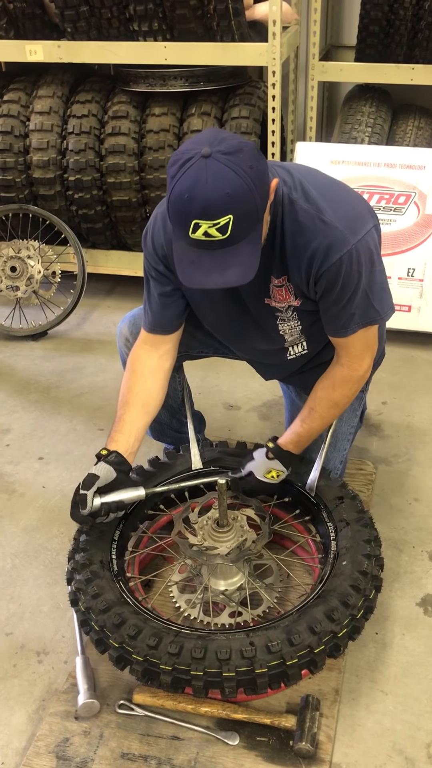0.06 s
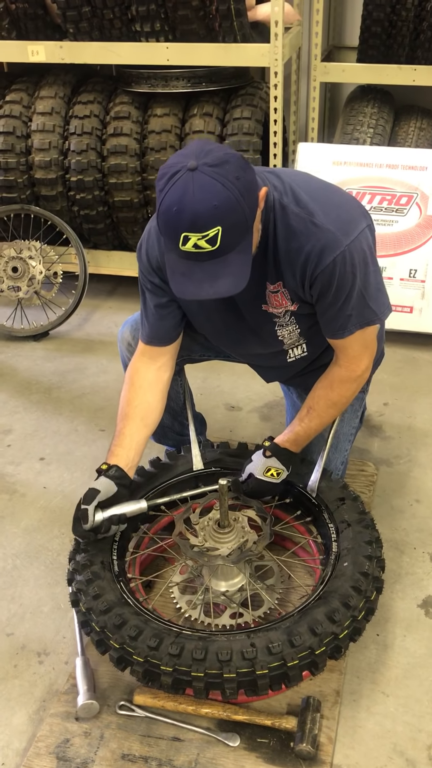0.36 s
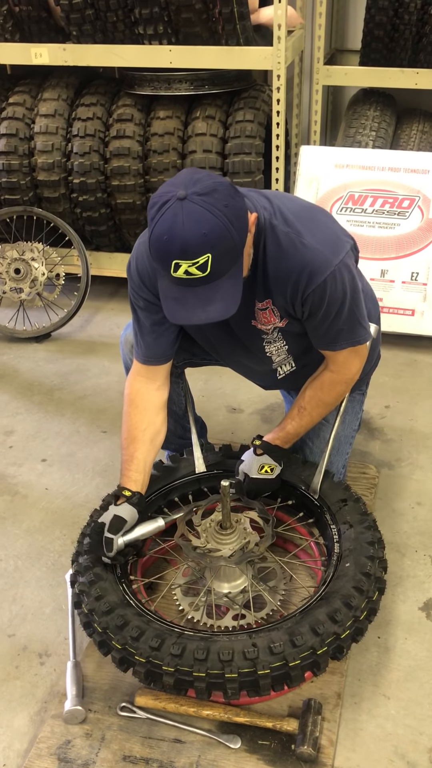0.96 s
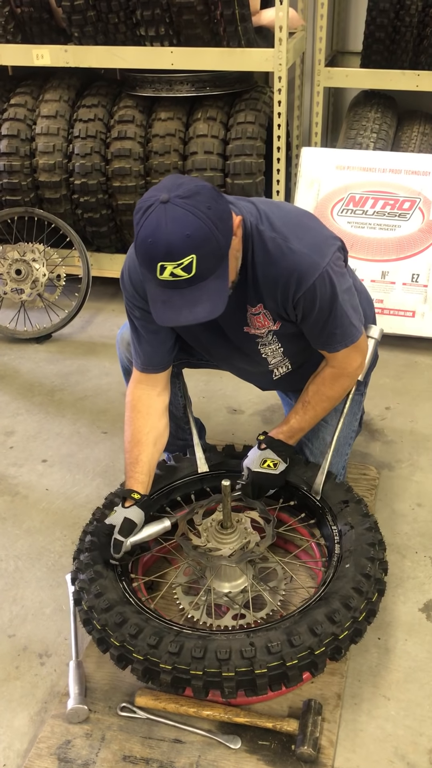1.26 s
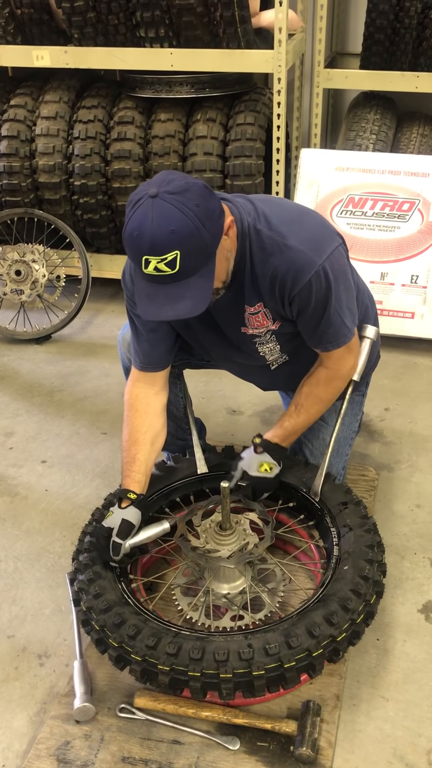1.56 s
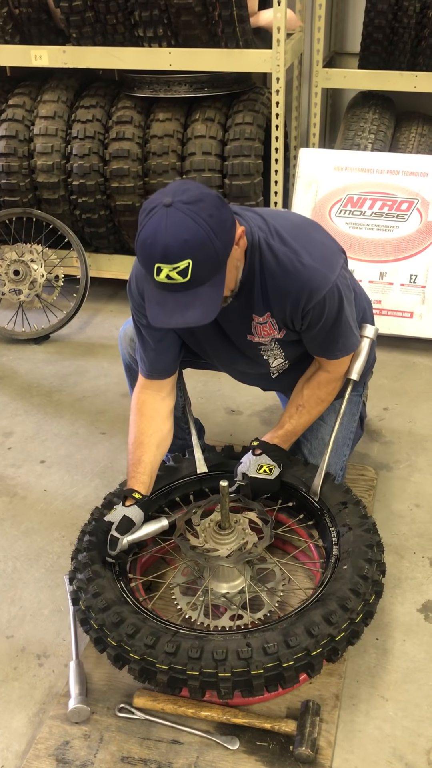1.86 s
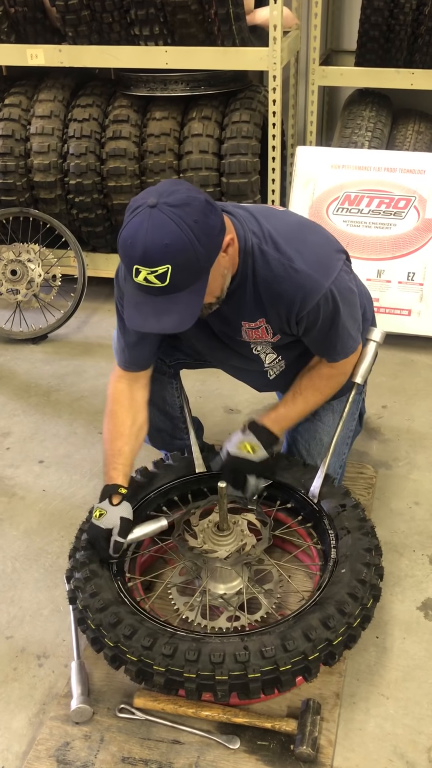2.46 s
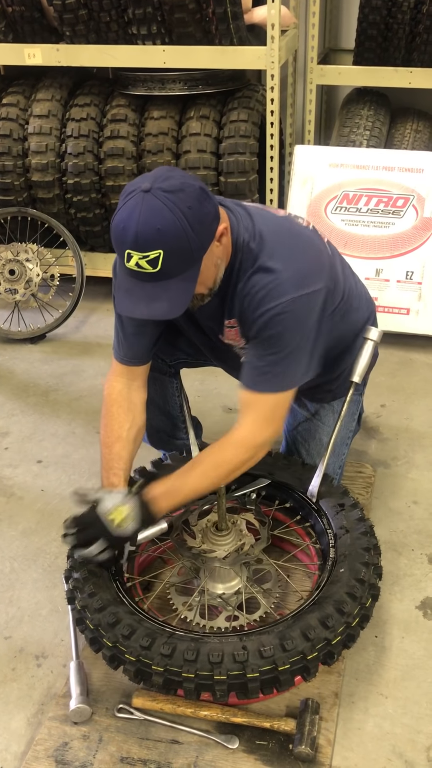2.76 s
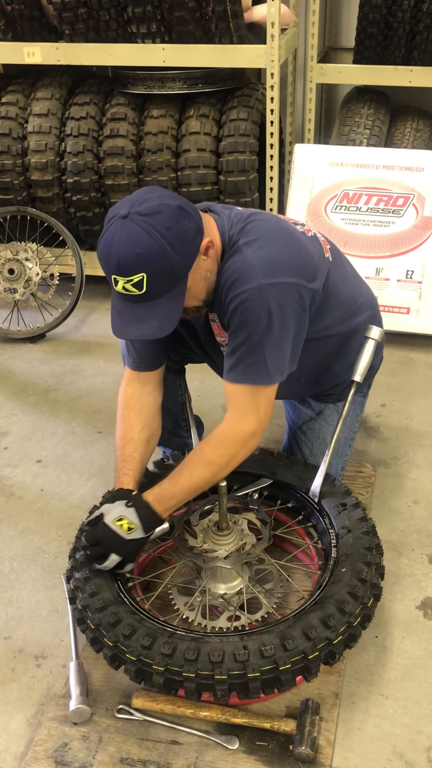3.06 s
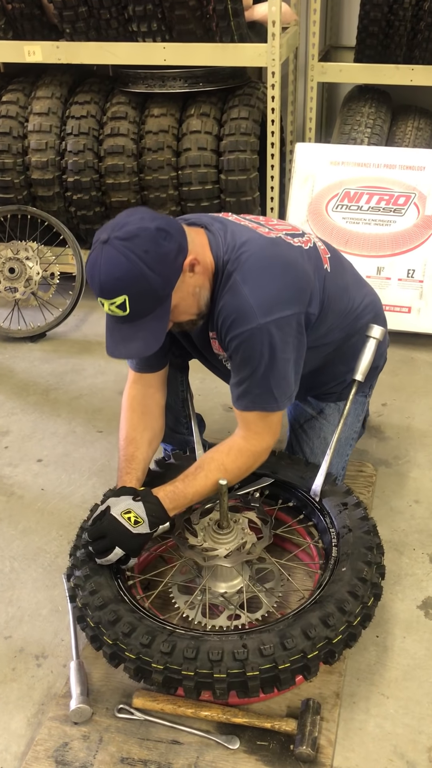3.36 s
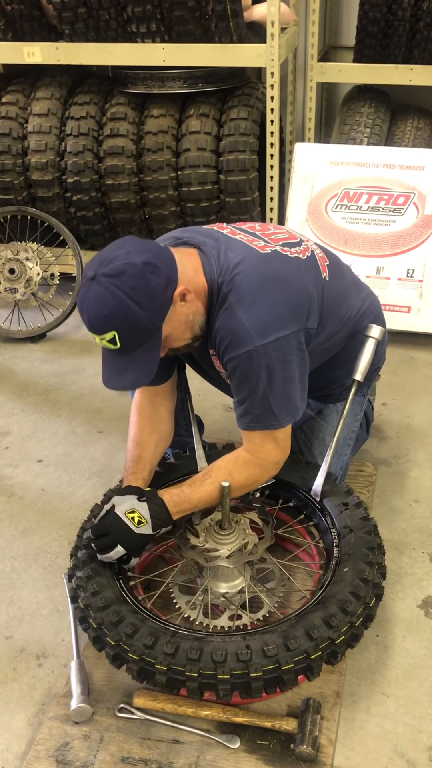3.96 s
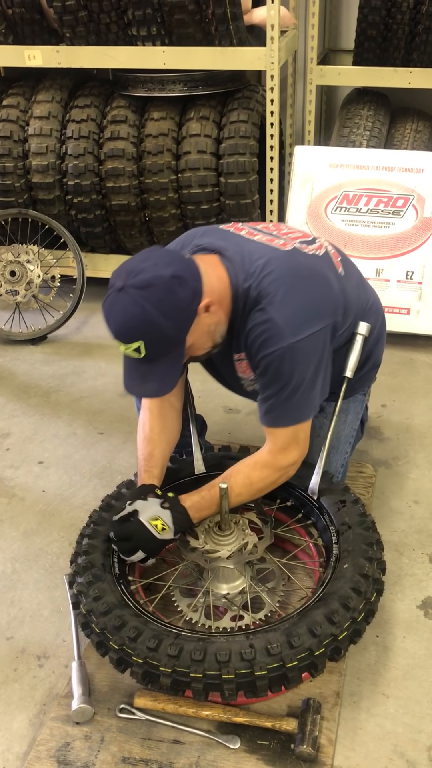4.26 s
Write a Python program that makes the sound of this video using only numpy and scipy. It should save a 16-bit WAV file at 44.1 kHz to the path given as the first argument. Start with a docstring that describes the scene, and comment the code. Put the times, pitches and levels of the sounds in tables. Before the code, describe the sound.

Steel tire irons work a tire onto a spoked motorcycle rim in a reverberant, hard-walled workshop, over a low, steady ventilation rumble. At about 0.6 seconds an iron clanks on the rim and rings briefly. Soft rubbing of gloves and rubber follows, with light clinks from 1.1 to 1.5 seconds and a few tiny, faint chirps around 1.7. From 2.1 seconds the iron creaks under load, growing louder and shriller. At 2.4 it skids with a loud clatter and a bright, quickly damped ring, while the tire gives a deep thump. Lighter clinks, soft bumps and rubbing come between 3.0 and 3.4 seconds. At 4.1 the iron skids again with a sharp crack, a quick run of ringing metal knocks and several tire thumps, ending around 4.3. A faint rub follows near 4.5 seconds.

```python
"""In a hard-walled workshop, steel tire irons lever a knobby tire onto a spoked motorcycle rim.
Impacts of an iron excite the modes of the wheel, and the handles ring until a glove damps them.
Under load the iron creaks by stick-slip friction, then skids twice with a clatter, once ringing loudly,
while the jumping bead makes the tire thump. Rubber rubs softly, a few faint chirps sound,
and the room reverberates over the rumble of ventilation."""
import sys
import numpy as np
from scipy import signal
from scipy.fft import rfft, irfft
from scipy.io import wavfile
from scipy.ndimage import uniform_filter1d

SR = 44100
rng = np.random.default_rng(int(sys.argv[2]) if len(sys.argv) > 2 else 0)


def store_pcm(level_fs):
    """Save levels as 16-bit WAV."""
    pcm = np.round(np.clip(level_fs, -1, 1) * 32767).astype(np.int16)
    wavfile.write(sys.argv[1], SR, np.atleast_2d(pcm).T)


N = 198753
TIME = np.arange(N) / SR

# impacts of iron on rim; the tip clinks at a pitch set by where it is pinched:
# (time [s], level [dB], body weight [dB], treble weight [dB], clink pitch [Hz], clink re level [dB])
IMPACTS = [(0.5807, -21.5, -2.5, -8.5, 1273, 7), (0.583, -29.5, -6.5, -17, 2330, 4),
           (1.1361, -47, -16, -1.5, 3180, -3), (1.275, -42.5, -7.5, -0.5, 3520, -16),
           (1.474, -60.5, 0, -29, 2650, 17.5), (2.378, -27.5, -18, 9, 3600, -10),
           (2.391, -25.5, -12, 2, 964, 11.5), (2.434, -22, -16, -18, 2613, 5),
           (3.051, -53.5, -1.5, 5.5, 6610, 9), (3.093, -40, -12, -15, 3486, 4),
           (3.117, -43.5, -14, -4, 1886, 13.5), (3.118, -43, -26, -6, 3470, 11.5),
           (3.275, -44, -4, -8, 5260, 8), (3.411, -39.5, -1.5, -7, 2980, 14),
           (3.4133, -36, -14, -6, 3230, 17.5), (3.415, -37.5, -6.5, -1, 5520, 12.5),
           (3.903, -42, -9, -30, 3220, 7), (4.112, -12.5, -30, 0, 3400, -15),
           (4.166, -30.5, -3, 0, 5510, 17), (4.189, -29, 7.5, -23, 1038, 15.5),
           (4.1999, -17.5, -11, -11, 2013, 7.5), (4.227, -20.5, -9.5, -9, 629, 5.5),
           (4.258, -23.5, -18, -3, 11300, -0.5)]


def amp(db):
    """Amplitude ratio of a level in decibels."""
    return 10 ** (np.asarray(db) / 20)


def unit(x):
    """Normalisation to rms 1."""
    return x / np.sqrt(np.mean(x ** 2) + 1e-20)


def read(points, hz):
    """Interpolation of (frequency [Hz], value) rows on a logarithmic frequency axis."""
    f, value = np.transpose(points)
    return np.interp(np.log(hz + 1), np.log(f + 1), value)


def add(mix, start_s, sound):
    """Superposition of a sound on the mix."""
    part = mix[max(round(start_s * SR), 0):][:len(sound)]
    part += sound[:len(part)]


def through(x, response):
    """Convolution of a track with an impulse response."""
    return signal.oaconvolve(x, response)[:N]


def wander(size):
    """Random fluctuation of rms 1: a moving average of noise over size samples."""
    return unit(uniform_filter1d(rng.standard_normal(N), size))


def stroke(start, length, db, attack_s, release_s, slope_db_per_s=0):
    """Exponential envelope of one movement: a 60 dB attack, a sloping hold, a 60 dB release."""
    t = TIME - start
    outside = np.maximum(-t, 0) / attack_s + np.maximum(t - length, 0) / release_s
    return amp(db + slope_db_per_s * np.clip(t, 0, length) - 60 * np.minimum(outside, 3))


def colour(points, lumps_db=0, size=4096):
    """Minimum-phase filter of energy 1 with the given spectrum and optional random peaks and dips."""
    hz = np.fft.rfftfreq(size, 1 / SR)
    ripple = unit(np.convolve(rng.standard_normal(len(hz)), signal.windows.hann(36), "same"))
    lumps = ripple * hz / (hz + 2000)
    log_gain = np.log(amp(read(points, hz) + lumps_db * lumps))
    mirrored = np.concatenate([log_gain, log_gain[-2:0:-1]])
    taps = np.fft.ifft(np.exp(np.conj(signal.hilbert(mirrored)))).real
    return taps / np.linalg.norm(taps)


def chatter(t60, size=8192):
    """Exponentially decaying noise of many tiny contacts, starting at about rms 1."""
    fade = amp(-60 * np.arange(size) / SR / t60)
    x = rng.standard_normal(size) * fade
    # flattening the spectrum keeps every contact equally strong
    for _ in range(2):
        x = irfft(np.exp(1j * np.angle(rfft(x)))) * np.sqrt(fade)
    return unit(x) * np.sqrt(np.mean(fade ** 2))


def grit(per_s, spread_db):
    """Friction as a Poisson process: random snaps of very unequal size."""
    sizes = amp(spread_db * np.minimum(rng.exponential(1, N), 4))
    return unit(sizes * rng.choice([-1, 1], N) * (rng.random(N) < per_s / SR))


def modes(table, t):
    """Free vibration: one damped sine per row (frequency [Hz], level [dB], t60 [s])."""
    return np.array([amp(db - 60 * t / t60) * np.sin(2 * np.pi * (hz * t + rng.random()))
                     for hz, db, t60 in table])


def resonances(table):
    """Impulse response, of energy 1, of resonators (frequency [Hz], bandwidth [Hz], level [dB])."""
    t = TIME[:SR // 4]
    body = sum(amp(db) * width * np.exp(-np.pi * width * t) * np.cos(2 * np.pi * hz * t)
               for hz, width, db in table)
    return body / np.linalg.norm(body)


def ventilation(level_db=-58):
    """Stationary broadband noise: the low rumble and hiss of the shop's air."""
    # spectrum of the ventilation: (frequency [Hz], relative density [dB])
    spectrum = [(15, -60), (25, -8.5), (69, 2.5), (129, -8.5), (147, -10.5), (363, -14), (393, -14.5),
                (476, -20.5), (942, -22), (1020, -24), (1770, -25.5), (2730, -34.5), (4980, -44),
                (6540, -63.5), (17000, -63)]
    noise = signal.fftconvolve(rng.standard_normal(2 * N), colour(spectrum))
    return amp(level_db) * noise[N // 2:][:N]


def rubbing(attack_s=0.29):
    """Friction noise of gloves and of rubber stretched over the rim; incoherent sources add in power."""
    # a glove or sleeve brushes the tire: (time [s], relative level [dB])
    brushes = [(0.769, -55.5), (1.01, -58), (1.143, -50), (1.28, -52), (1.39, -58.5), (1.67, -63),
               (2.97, -55.5), (3.13, -53.5), (3.757, -58), (4.47, -56)]
    # spectrum of rubbed rubber: (frequency [Hz], relative density [dB])
    spectrum = [(200, 5), (900, 7), (2000, 4.5), (4000, 2.5), (8000, -2), (17000, -4.5)]
    hands_power = sum(stroke(start, 0, db - 1.5, attack_s, release_s=0.41) ** 2 for start, db in brushes)
    strain = stroke(start=1.946, length=0.34, db=-62, attack_s=attack_s, release_s=1.5,
                    slope_db_per_s=44.5)
    fidget = amp(-69)  # faint rubbing that never stops
    friction = np.sqrt(hands_power + strain ** 2 + fidget ** 2)
    return through(grit(per_s=7000, spread_db=5) * friction, colour(spectrum))


def ringing_irons(damped_t60=0.059):
    """Handle and shaft of a freed iron vibrate in their normal modes until the glove adds damping."""
    # free vibrations: (time [s], handle [dB], shaft [dB], undamped time [s], handle tilt [dB/octave])
    rings = [(0.004, -67, -70, .06, 10), (0.262, -67, -77, .012, -11), (0.582, -34.5, -45, .045, -20),
             (1.475, -58, -65, .04, -18), (1.772, -63, -72, .006, 5), (2.385, -38, -43, .03, 2),
             (2.433, -31.5, -30.5, .05, -1), (4.14, -42, -46, .15, 2)]
    # modes of the hollow handle: (frequency [Hz], relative level [dB], t60 [s])
    handle_modes = [(5860, 0, .9), (7090, -3, .6), (8750, -5, .8), (11180, -11, .3), (13680, -20, .25)]
    # bending modes of the steel shaft: (frequency [Hz], relative level [dB], t60 [s])
    shaft_modes = [(757, -5, .4), (1515, -5, .3), (2080, -10, .4), (2700, 1, .3), (2765, -3, .25),
                   (4188, -6, .8)]
    out, t = np.zeros(N), TIME[:SR // 3]
    octaves = np.log2(np.transpose(handle_modes)[0] / handle_modes[0][0])
    for start, handle_db, shaft_db, free_s, tilt_db in rings:
        grip = amp(-60 * np.maximum(t - free_s, 0) / damped_t60)
        handle = amp(handle_db + tilt_db * octaves) @ modes(handle_modes, t)
        shaft = amp(shaft_db) * modes(shaft_modes, t).sum(0)
        add(out, start, grip * (handle + shaft))
    return out


def tire_thumps(push_s=0.0013, t60=0.038, heavy_db=-31):
    """Each jump of the bead excites heavily damped modes of the carcass; heavy jumps sound deeper."""
    # jumps of the bead: (time [s], level [dB])
    jumps = [(0.257, -61), (0.583, -41), (1.437, -43), (1.494, -54.5), (2.3105, -40), (2.3798, -18),
             (2.3907, -29), (2.424, -36), (3.213, -40), (3.277, -45.5), (3.404, -46), (4.116, -22.5),
             (4.198, -23), (4.225, -32), (4.26, -32)]
    # modes of tire and wheel together: (frequency [Hz], relative level [dB])
    carcass_modes = [(125, -3.5), (170, 2.5), (215, 1), (330, -0.5), (430, -3), (545, -2), (640, -6),
                     (860, -3), (1040, -7.5)]
    out, t = np.zeros(N), TIME[:SR // 4]
    hz, mode_db = np.transpose(carcass_modes)
    polarity = (-1) ** np.arange(len(hz))[:, None]
    swings = polarity * np.sin(2 * np.pi * hz[:, None] * t)
    for start, db in jumps:
        fade = amp(db - 60 * t / t60) * (1 - np.exp(-t / push_s))
        tilt_db_per_octave = 0.091 * (heavy_db - db)
        weights = amp(mode_db + tilt_db_per_octave * np.log2(hz / hz[1]))
        add(out, start, fade * (weights @ swings))
    return out


def blows():
    """Impact excitation: each contact chatters briefly, and its spot on the rim shapes the spectrum."""
    out = np.zeros(N)
    for start, db, body_db, treble_db, _, _ in IMPACTS:
        # (frequency [Hz], relative density [dB])
        spectrum = [(80, body_db - 27.5), (300, body_db - 9.5), (560, body_db + 14),
                    (880, body_db + 5.5), (1300, body_db + 11.5), (2000, 1), (3400, 5.5), (6500, -2.5),
                    (10000, treble_db + 0.5), (17000, treble_db - 9.5)]
        gain = amp(db) * np.sqrt(1 + amp(body_db) ** 2 + amp(treble_db) ** 2)
        add(out, start, gain * signal.fftconvolve(chatter(t60=0.043), colour(spectrum, lumps_db=4)))
    return out


def wheel(force, ring_db=-51):
    """Modal response: a contact is heard directly and sets rim, spokes and disc ringing."""
    # modes of the wheel: (frequency [Hz], relative level [dB], t60 [s])
    wheel_modes = [(540, -10, .15), (634, -10, .3), (867, -14, .25), (1035, -10, .2), (1320, -7, .2),
                   (1615, -10, .2), (1990, -8, .2), (2232, -9, .4), (2406, -10, .2), (2512, -9, .3),
                   (2970, -8, .15), (3177, -5, .3), (3440, -5, .15), (3830, -10, .2), (4055, -11, .3),
                   (4560, -8, .25), (5390, -2, .25), (5520, -5, .15), (5825, -5, .35), (7100, -6, .2),
                   (8448, -7, .2), (10140, -6, .2), (11280, -9, .15)]
    response = modes(wheel_modes, TIME[:SR // 2]).sum(0)
    return force + amp(ring_db) * through(force, response)


def clinks(attack_s=0.00059, t60=0.021, buzz_rad=0.72):
    """Damped vibration of the pinched tip, phase-modulated by its buzzing against the rim."""
    out, t = np.zeros(N), TIME[:SR // 6]
    buzz = buzz_rad * unit(uniform_filter1d(wander(size=40), size=40))
    for start, db, _, _, hz, clink_db in IMPACTS:
        phase = 2 * np.pi * hz * t + buzz[round(start * SR):][:len(t)]
        fade = amp(db + clink_db - 60 * t / t60) * (1 - np.exp(-t / attack_s))
        add(out, start, fade * np.sin(phase))
    return out


def chirps(top_hz=5090, level_db=-66, length_s=0.026, arch=0.023):
    """Frequency glides: tiny whistles whose pitch and amplitude rise and fall along a parabola."""
    # onsets of the whistles: (time [s])
    onsets = [1.675, 1.72, 1.783, 4.07]
    out, u = np.zeros(N), np.linspace(-1, 1, round(length_s * SR))
    turns = np.cumsum(top_hz * (1 - arch * u ** 2)) / SR
    whistle = amp(level_db) * (1 - u ** 2) * np.sin(2 * np.pi * turns)
    for start in onsets:
        add(out, start, whistle)
    return out


def creak(slips_per_s=740, jitter=0.5, shrill_lag_s=0.011, shrill_power=5.1):
    """Stick-slip on the rim lip drives the iron's resonances, faster and shriller as the push builds."""
    # resonances of the loaded iron: (frequency [Hz], bandwidth [Hz], relative level [dB])
    body_modes = [(350, 120, -11.5), (530, 174, -6.5), (863, 140, -9), (1650, 120, -1), (1950, 54, -1.5),
                  (2219, 30, 5), (2470, 50, -30.5), (2870, 80, -31)]
    # thin overtones that only a hard push excites: (frequency [Hz], bandwidth [Hz], relative level [dB])
    shrill_modes = [(3480, 70, 6), (4400, 120, -2), (5230, 40, 3), (5480, 90, 1), (7100, 60, -6),
                    (8700, 60, -4), (10200, 55, -5), (12500, 35, -5), (13800, 35, -9), (14400, 35, -7),
                    (15400, 45, -4), (16400, 35, -6)]
    push = stroke(start=2.13, length=0.112, db=-32.5, attack_s=0.13, release_s=0.09, slope_db_per_s=65)
    effort = push / push.max()
    slip_rate = slips_per_s * effort ** 0.16 * np.exp(jitter * wander(size=60))
    slip_count = np.floor(np.cumsum(slip_rate) / SR)
    slips = np.diff(slip_count, prepend=0) * np.sqrt(SR / slips_per_s)
    # burrs on the rim lip make some slips much sharper than others
    burrs = unit(amp(4.5 * wander(size=70)))
    hard_push = np.interp(TIME - shrill_lag_s, TIME, push.max() * effort ** shrill_power)
    snaps = slips * burrs * hard_push
    body = through(slips * push, resonances(body_modes))
    shrill = through(snaps, resonances(shrill_modes))
    return amp(-2) * body + amp(-7) * shrill + amp(-24) * snaps


def skids(release_s=0.15):
    """Sliding friction sprays dense snaps while the iron bounces on the rim, ever more weakly."""
    # the iron skids along the bead: (time [s], length [s], level [dB], attack [s])
    slides = [(2.376, 0.066, -27, .005), (4.115, 0.13, -28, 0.044)]
    # spectrum of the sliding steel: (frequency [Hz], relative density [dB])
    spray_spectrum = [(150, -16.5), (600, 9.5), (2500, 2), (5000, -4), (8000, -3.5), (12000, -21),
                      (17000, -16)]
    # spectrum of the bounces: (frequency [Hz], relative density [dB])
    rattle_spectrum = [(100, -19.5), (350, -22.5), (800, -3), (2000, -10.5), (3400, -1), (6500, -7),
                       (10000, -11.5), (17000, -16.5)]
    slide = sum(stroke(*row, release_s, slope_db_per_s=-20) for row in slides)
    bounce = sum(stroke(*row, release_s, slope_db_per_s=-96) for row in slides)
    spray = through(grit(per_s=5000, spread_db=5.5) * slide, colour(spray_spectrum))
    contacts = through(grit(per_s=410, spread_db=3.5) * bounce, chatter(t60=0.033))
    bounce_rms = np.sqrt(np.mean(bounce ** 2))
    rattle = through(unit(contacts) * bounce_rms, colour(rattle_spectrum))
    return spray + amp(-0.5) * rattle


def handle_ring(pitch_hz=2910, waver=0.0061):
    """Free vibration: a brief, bright, slightly wavering ring of the handle, cut short by the glove."""
    harmonics = [(1, -17.5), (2, 4.5), (3, 4.5)]  # (harmonic number, relative level [dB])
    turns = np.cumsum(pitch_hz * (1 + waver * wander(size=90))) / SR
    gain = stroke(start=2.436, length=0.036, db=-33, attack_s=0.02, release_s=0.02)
    return gain * sum(amp(db) * np.sin(2 * np.pi * k * turns) for k, db in harmonics)


def room(x, wet_db=-2, build_s=0.0022):
    """Reverberation: a few hard early reflections and a diffuse tail whose treble dies first."""
    # reverberation time: (frequency [Hz], t60 [s])
    decay_times = [(100, 0.52), (500, 0.72), (1500, 0.75), (3500, 0.76), (6000, 0.72), (9000, 0.48),
                   (16000, 0.23)]
    # starting spectrum of the tail: (frequency [Hz], relative level [dB])
    spectrum = [(100, 9.5), (600, 3.5), (3000, -3), (7000, -4.5), (11000, -1), (17000, 9.5)]
    # reflections from floor, shelves and walls: (delay [s], level [dB])
    reflections = [(.0031, -15), (.0068, -39), (0.0145, -10.5), (0.0202, -18), (.0205, -11)]
    hz, t, noise = signal.stft(rng.standard_normal(SR), SR, nperseg=256)
    fade = amp(read(spectrum, hz)[:, None] - 60 * t / read(decay_times, hz)[:, None])
    tail = signal.istft(noise * fade, SR, nperseg=256)[1][:SR]
    tail *= 1 - np.exp(-(TIME[:SR] / build_s) ** 2)
    tail *= amp(wet_db) / np.linalg.norm(tail)
    for delay, db in reflections:
        add(tail, delay, amp(db) * np.array([1, 4, 1]) / 5)  # each slightly dulled
    return x + through(x, tail)


def scene():
    """Superposition of the work at the wheel, its reverberation and the ventilation."""
    knocks = wheel(blows() + skids()) + clinks()
    work = knocks + ringing_irons() + handle_ring() + tire_thumps() + creak() + rubbing() + chirps()
    return (room(work) + ventilation())[None]


def record(dry, low_hz=38, high_hz=17700):
    """Band limiting: the microphone cuts the deepest bass and the highest treble."""
    low_cut = signal.butter(4, low_hz, "highpass", fs=SR, output="sos")
    high_cut = signal.firwin(511, high_hz, window=("kaiser", 9), fs=SR)
    return signal.oaconvolve(signal.sosfilt(low_cut, dry), high_cut[None], "same")


dry = scene()
out = record(dry)
store_pcm(out)
```